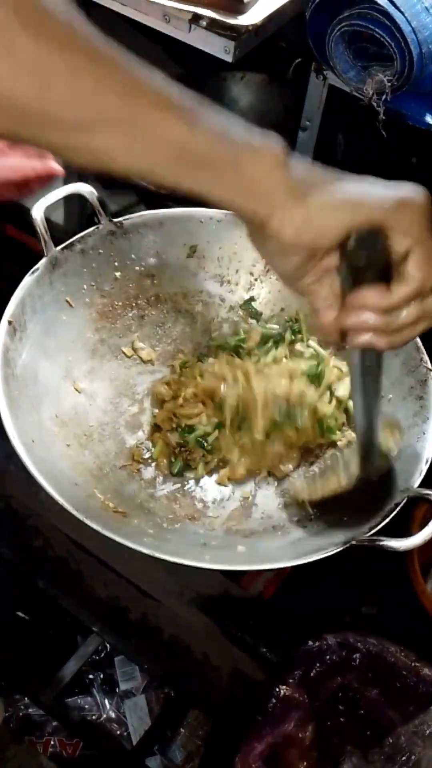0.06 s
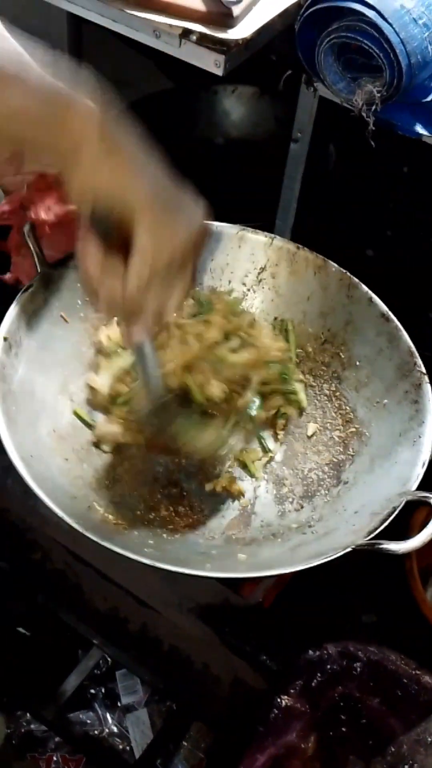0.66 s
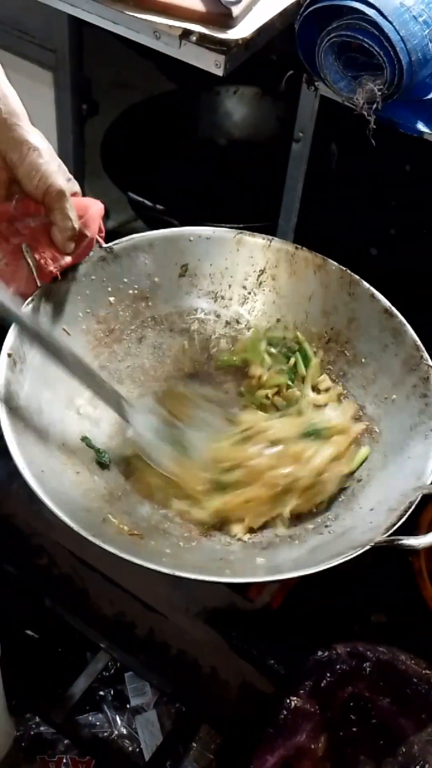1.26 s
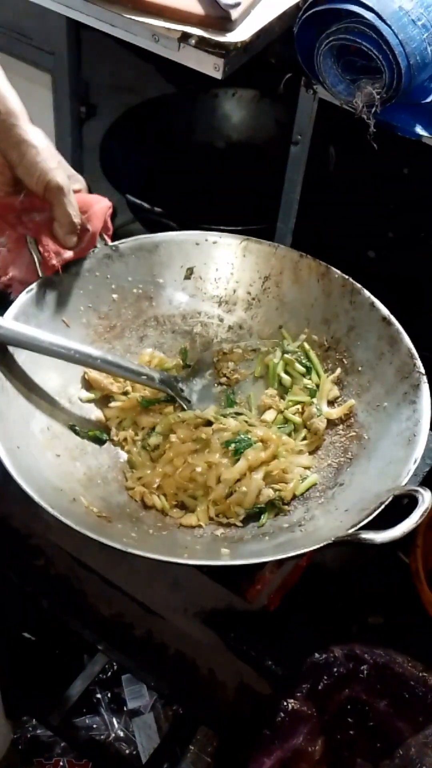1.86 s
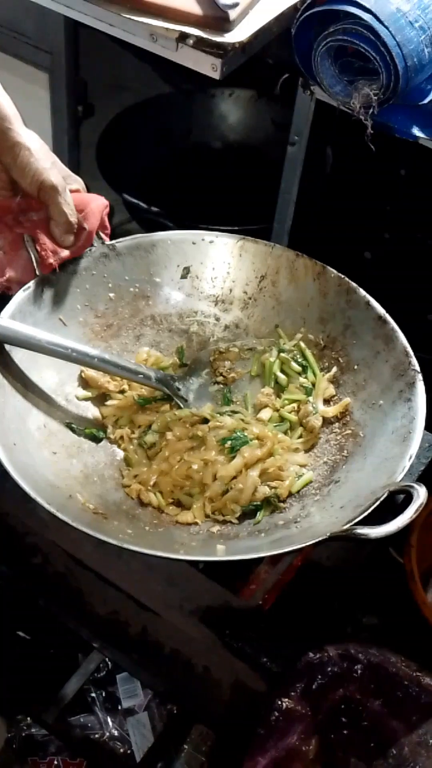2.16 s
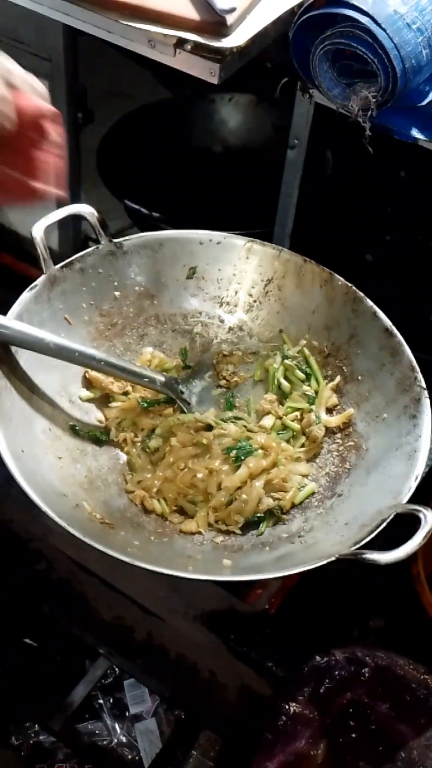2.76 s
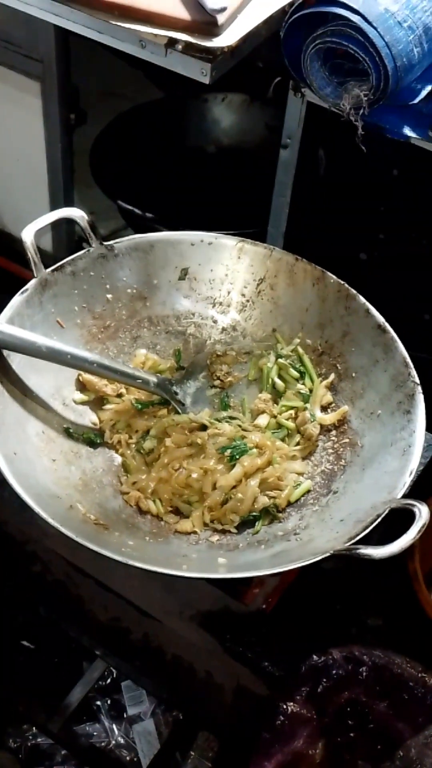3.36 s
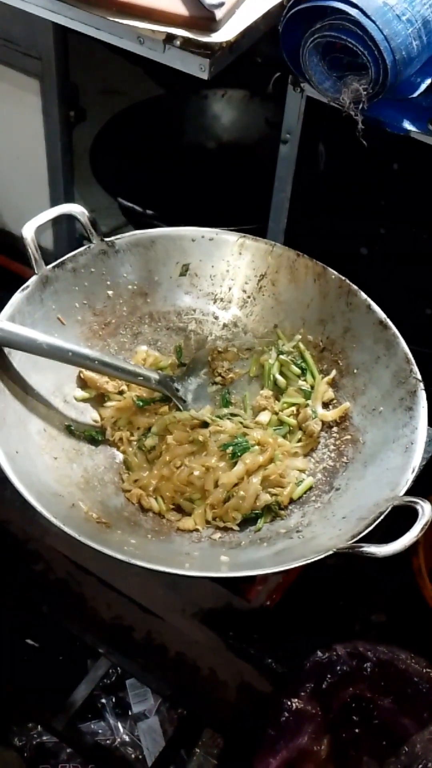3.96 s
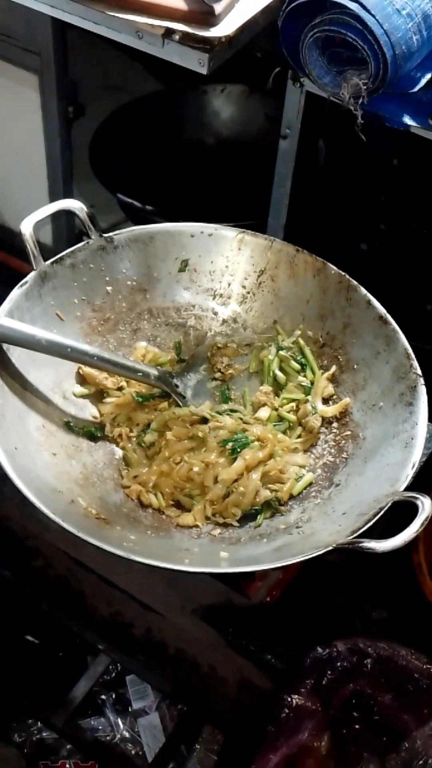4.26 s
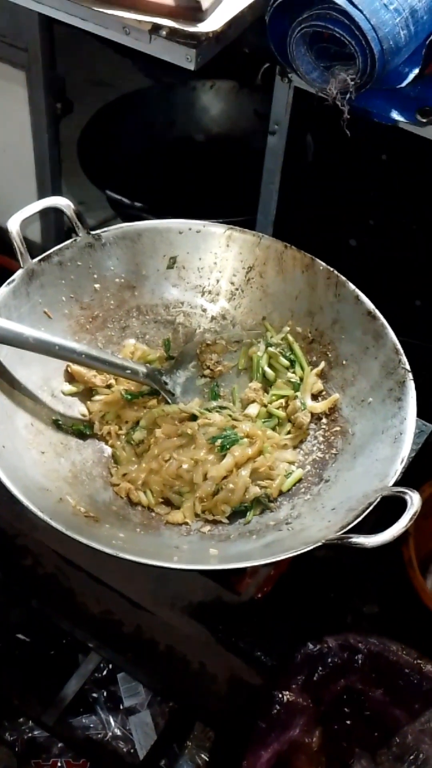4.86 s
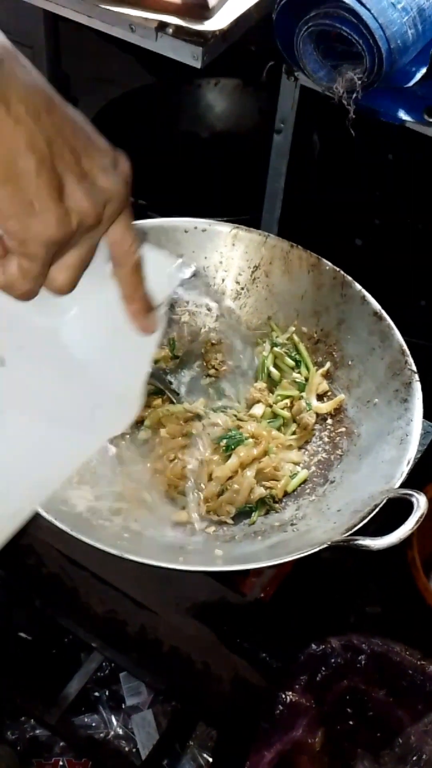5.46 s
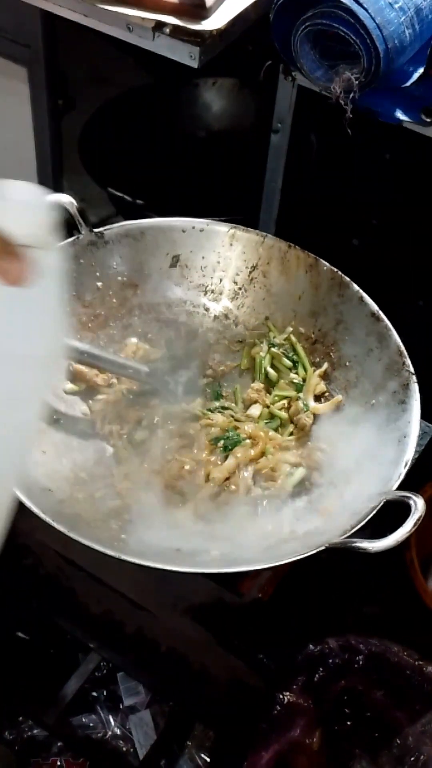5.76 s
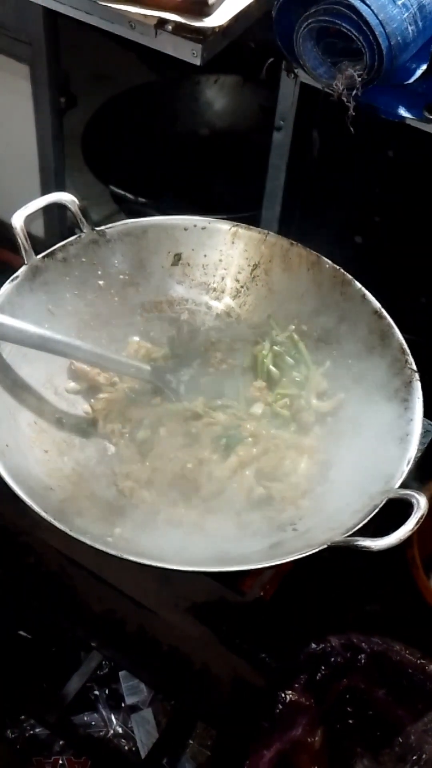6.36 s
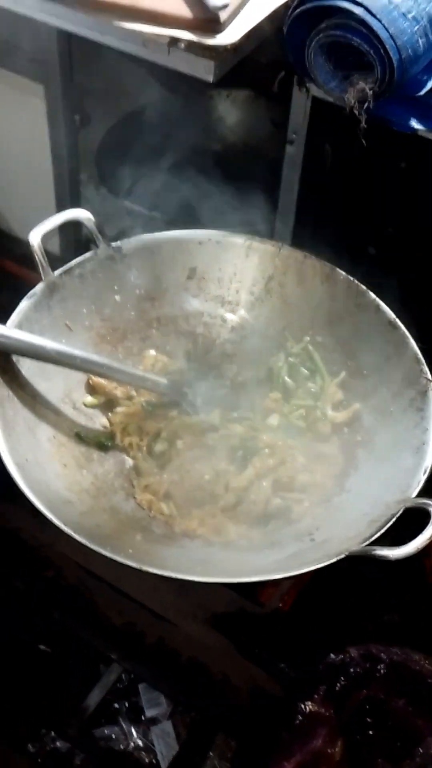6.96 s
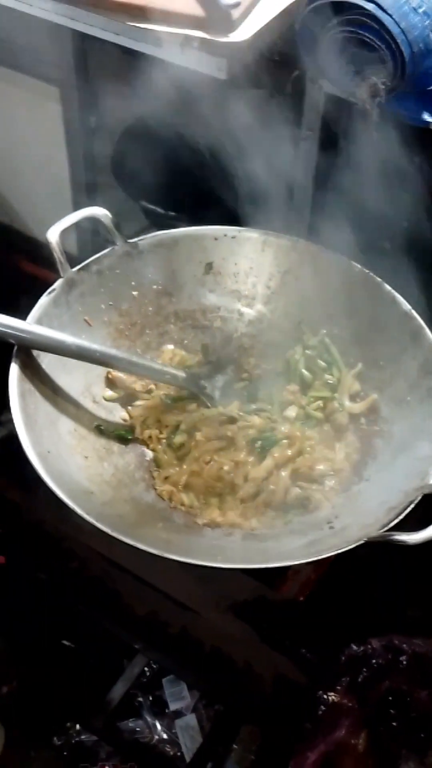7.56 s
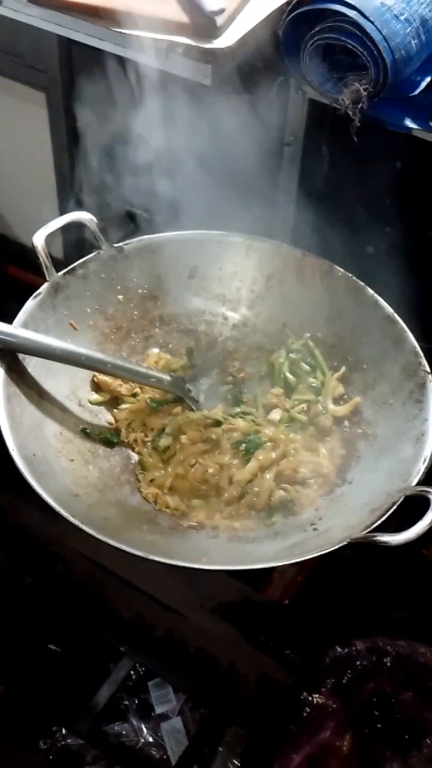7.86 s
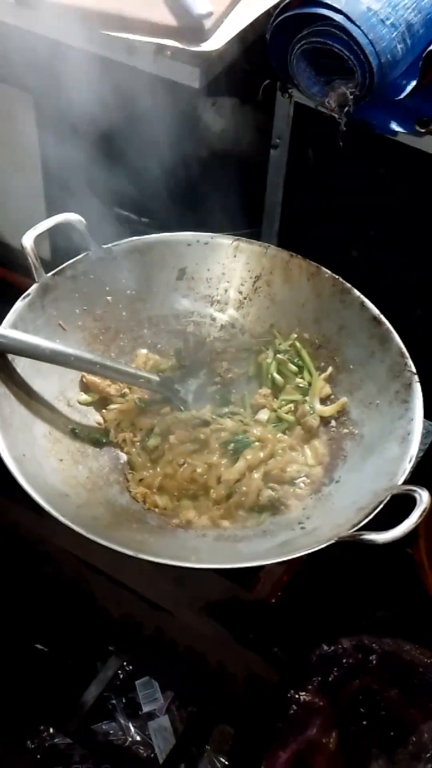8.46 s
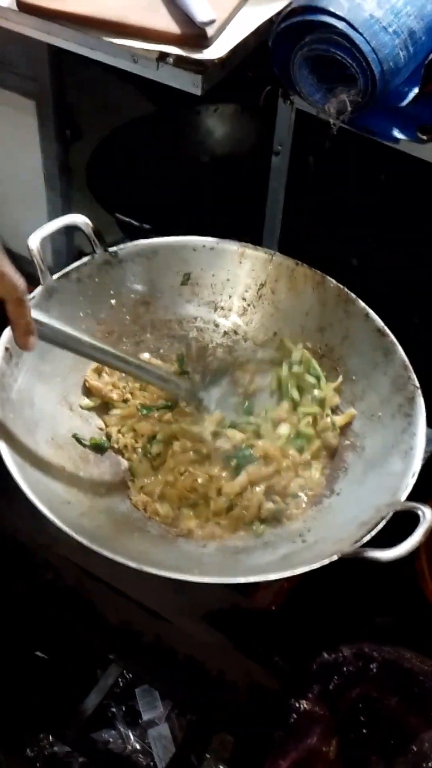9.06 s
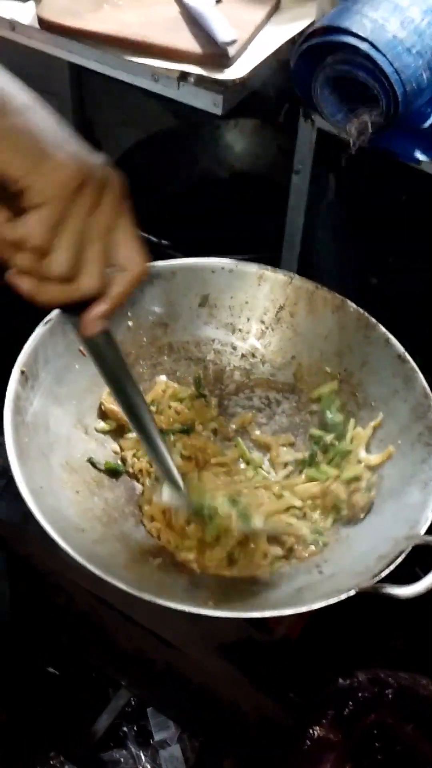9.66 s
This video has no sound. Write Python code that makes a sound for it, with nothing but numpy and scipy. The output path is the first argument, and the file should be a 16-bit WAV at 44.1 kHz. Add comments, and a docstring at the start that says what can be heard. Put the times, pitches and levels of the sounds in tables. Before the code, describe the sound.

Noodles sizzle in a steel wok over a roaring gas burner as a metal spatula scrapes and clanks, and added water hisses up.

```python
"""A gas burner roars and noodles sizzle in a steel wok, close to the microphone. A metal spatula
scrapes round the bowl, sticking and slipping, drops against it with a clank and rests. A splash of
water flares into steam, then stirring resumes. The sizzle is tiny bubbles bursting; steam whistles
faintly from under the food, and the flame makes the stove chamber sing. The two microphone ports
ring differently: the left near 2 and 7 kHz, the right near 10.5 kHz."""
import sys
import numpy as np
from scipy import signal
from scipy.fft import rfft, irfft, next_fast_len
from scipy.io import wavfile
from scipy.ndimage import uniform_filter1d

SR = 44100
rng = np.random.default_rng(int(sys.argv[2]) if len(sys.argv) > 2 else 0)


def wav_record(signal):
    """Record a signal, one row per channel, as 16-bit PCM in the file named by sys.argv[1]."""
    frames = np.transpose(np.atleast_2d(signal))
    bounded = np.clip(frames, -1, 1)
    # unit amplitude maps onto the largest positive 16-bit level
    quanta = np.round(bounded * 32767).astype(np.int16)
    wavfile.write(sys.argv[1], SR, quanta)


N = 429093
TIME = np.arange(N) / SR

# Colour of struck steel at the microphone. Each row: frequency in Hz, left and right level in dB.
STEEL_COLOUR = [(170, -28, -26), (460, -5, -2), (890, -7, -1.5), (1220, -1, -2), (1450, 3.5, 4),
                (2110, 8.5, -2), (3000, -21, -27), (3630, -14, -15), (4270, -4, -3), (5600, 2.5, 6.5),
                (6300, 5, 2), (7200, 17, 2), (8350, 1, 5.5), (9360, -6, 8), (9900, -14, 3),
                (11000, -10, 16), (12200, -14, 4.5), (13300, -18, -14)]


def gain_of(db):
    """Decibels to amplitude."""
    return 10 ** (np.asarray(db) / 20)


def unit_rms(x):
    """Scales to rms 1."""
    return x / np.sqrt(np.mean(x ** 2) + 1e-20)


def by_time(rows, t):
    """Every column of a curve at the times t."""
    s, *columns = np.transpose(rows)
    return np.array([np.interp(t, s, c) for c in columns])


def by_pitch(rows, hz):
    """Every column of a spectrum at the frequencies hz."""
    f, *columns = np.transpose(rows)
    return np.array([np.interp(np.log(hz + 1), np.log(f), c) for c in columns])


def add(mix, s, sound):
    """Mixes a stereo sound in at s seconds."""
    part = mix[:, round(s * SR):][:, :sound.shape[1]]
    part += sound[:, :part.shape[1]]


def tint(x, spectrum_db):
    """Filters by a function from Hz to dB; rms 1."""
    size = next_fast_len(x.shape[-1])
    gain = gain_of(spectrum_db(np.fft.rfftfreq(size, 1 / SR)))
    return unit_rms(irfft(rfft(x, size) * gain, size)[..., :x.shape[-1]])


def sweep(x, field_db, size):
    """Filters by a function from (Hz, s) to dB."""
    frames = dict(fs=SR, nperseg=size, noverlap=size * 3 // 4)
    hz, t, spectra = signal.stft(x, **frames)
    return signal.istft(spectra * gain_of(field_db(hz, t)), **frames)[1][..., :N]


def treble(x, edge_hz, order=2):
    """Keeps what lies above edge_hz."""
    return signal.sosfilt(signal.butter(order, edge_hz, "high", fs=SR, output="sos"), x)


def bell(offset, width):
    """Bell curve, 1 at zero offset."""
    return np.exp(-.5 * (offset / width) ** 2)


def swell(top_s, half_s):
    """Envelope that rises to 1 at top_s and falls again."""
    return np.exp(-((TIME - top_s) / half_s) ** 2)


def surges(rows, t):
    """Joint amplitude of overlapping surges that rise and die away, for each level column."""
    power = 0
    for start, rise_s, fade_db_per_s, *levels_db in rows:
        rise = np.sin(np.pi / 2 * np.clip((t - start) / rise_s, 0, 1))
        fade = gain_of(-fade_db_per_s * np.maximum(t - start - rise_s, 0))
        power += (gain_of(levels_db)[:, None] * rise * fade) ** 2
    return np.sqrt(power)


def waver(rate_hz, shape=N):
    """Slow random movement, mostly below rate_hz; rms 1."""
    return tint(rng.standard_normal(shape), lambda hz: -20 * np.log10(1 + (hz / rate_hz) ** 2))


def crackle(per_s, spread_db):
    """Random clicks, most of them small and a few large; rms 1."""
    size = gain_of(spread_db * np.minimum(rng.exponential(1, N), 5))
    return unit_rms(size * rng.choice([-1, 1], N) * (rng.random(N) < per_s / SR))


def mode(hz, t):
    """A sine that reaches each port in a random phase."""
    return np.sin(2 * np.pi * (hz * t + rng.random((2, 1))))


def burner(roar_db=1.0, rumble_db=-37.0, jet_db=-51.5, rush_hz=720, gust_db=0.88, lick_db=2.0):
    """A turbulent flame roars under the bowl over the steady hiss of the gas jet."""
    # Draught of the burner. Each row: time in seconds, roar in dB, lift of the higher rush in dB.
    draught = [(0, -38.5, 2), (1.1, -38, 0.5), (1.55, -35, -10), (1.9, -35, -1), (2.15, -37.5, -5.5),
               (4.2, -38.5, -4), (4.7, -39.5, -7.5), (5.5, -37, -8), (5.85, -36.5, -3.5), (6.7, -37.5, 0.5),
               (7.1, -36, -2.5), (7.5, -37.5, -3), (7.85, -37.5, 2.5), (8.5, -38, -1.5), (9.05, -34.5, 2.5),
               (9.25, -39, 1.5), (9.73, -36, 0)]
    # Colour of the roar. Each row: frequency in Hz, relative level in dB.
    roar_colour = [(25, -47), (60, -30), (128, -13), (150, -20), (168, -35), (200, -11.5), (300, -2.5),
                   (355, -0.5), (430, -3.5), (495, -6), (560, -11.5), (800, -20), (960, -25.5),
                   (1250, -33.5), (3000, -57)]
    # Peaks and hollows from stove and bowl. Each row: frequency in Hz, width in Hz, lift in dB.
    stove_peaks = [(292, 10, 2.5), (355, 18, 2), (435, 14, -3), (490, 12, 3), (526, 20, -5), (574, 11, 5),
                   (613, 11, 4), (778, 20, 2.5), (850, 15, -2.5), (905, 20, 2), (1130, 22, 4)]
    # Likeness of the flame at the two ports. Each row: frequency in Hz, correlation from -1 to 1.
    port_likeness = [(30, 1), (130, 0.97), (300, 0.98), (470, 0.77), (630, 0.056), (1400, 1), (2000, -1)]
    # A hollow howl in the roar. Each row: time in seconds, pitch in Hz, lift in dB.
    howl = [(7.0, 565, -1), (7.2, 570, 3.5), (7.5, 590, 7.5), (7.85, 613, 5), (8.15, 610, 6),
            (8.55, 610, -3), (8.9, 640, 1.5)]
    # Colour of the gas jet. Each row: frequency in Hz, left and right level in dB.
    jet_colour = [(300, -2, 3), (1270, -0.5, 3), (2010, 16.5, 11.5), (2570, 7.5, -34), (6250, -5.5, 4),
                  (8650, 14.5, -7), (10500, -15, 7), (14000, -58, 6.5)]

    common, separate = rfft(rng.standard_normal((2, N)))
    bins_hz = np.fft.rfftfreq(N, 1 / SR)
    likeness = np.clip(by_pitch(port_likeness, bins_hz)[0], -1, 1)
    left = common * np.exp(-2j * np.pi * bins_hz * 0.0001)  # farther from the flame: 0.1 ms late
    right = likeness * common + np.sqrt(1 - likeness ** 2) * separate
    roar = tint(irfft([left, right], N), lambda hz: by_pitch(roar_colour, hz)
                + sum(db * bell(hz - peak_hz, width) for peak_hz, width, db in stove_peaks))
    turbulence = waver(rate_hz=3.5), waver(rate_hz=3.5)

    def flame_db(hz, t):
        """The rumble holds steady, the roar gusts, and flames licking the rim add a higher rush."""
        hz = hz[:, None]
        level_db, rush_db = by_time(draught, t)
        howl_hz, howl_db = by_time(howl, t)
        gust, lick = (np.interp(t, TIME, curve) for curve in turbulence)
        rim_db = bell(np.log2((hz + 1) / rush_hz), width=0.31) * (rush_db + lick_db * lick)
        hollow_db = howl_db * bell(hz - howl_hz, width=38)
        return np.where(hz < 170, rumble_db, level_db + roar_db + gust_db * gust + rim_db + hollow_db)

    jet = tint(rng.standard_normal((2, N)), lambda hz: by_pitch(jet_colour, hz))
    return sweep(roar, flame_db, size=1024) + gain_of(jet_db) * jet


def sizzle(colour, bend, band, bubbles_per_s, spread_db, trim_db=6.5, sputter_db=0.33, patchy_db=1.5):
    """Tiny bubbles burst on hot steel. bend scales the pitch; band 0 is high fizz, 1 lower hiss."""
    # The simmer sinks as the noodles dry and returns with the water.
    # Each row: time in seconds, fizz and hiss in dB.
    simmer = [(0, -41, -49), (.65, -49, -41.5), (1.1, -42, -50), (2.3, -48, -50), (2.85, -39.5, -43.5),
              (4.3, -44, -46.5), (5.25, -45, -49), (6.8, -43, -43.5), (8.1, -38, -41.5), (8.6, -37.5, -39),
              (8.85, -40, -39), (9.73, -38.5, -43.5)]
    # Wet food or water flares on hot steel.
    # Each row: start and rise in seconds, fade in dB per second, fizz and hiss in dB.
    flares = [(.05, .15, 2, -37.5, -52), (1.17, 0.21, 8, -33, -37.5), (1.86, 0.11, 49, -39, -53),
              (5.36, 0.21, 8, -28, -37), (5.6, 0.12, 15, -27.5, -34), (6.95, 0.15, 13, -35, -41.5),
              (7.42, 0.059, 30, -35.5, -38), (7.66, 0.085, 54, -40.5, -36), (9.14, .06, 65, -52, -40),
              (9.36, 0.11, 8, -37.5, -41)]
    # Extra width of the sizzle's band. Each row: time in seconds, push towards the wide colour in dB.
    widening = [(0, 4.5), (1.2, 0), (5.35, -2.5), (6.0, 9), (6.25, -1), (7.2, -2.5), (9.73, -0.5)]
    # Levels for the narrow, medium and wide colour, in that order. Each row: fizz and hiss in dB.
    width_levels = [(-44, -48), (-37.5, -40.5), (-26, -33)]

    def sizzle_db(hz, t):
        """The sizzle's band sounds narrow when quiet and wider when loud."""
        power = gain_of(by_time(simmer, t)) ** 2 + surges(flares, t) ** 2
        sputter = np.interp(t, TIME, waver(rate_hz=16.0))
        level_db = 10 * np.log10(power[band]) + sputter_db * sputter
        width_db = level_db + by_time(widening, t)[0]
        steps_db = np.transpose(width_levels)[band]
        shares = np.array([np.interp(width_db, steps_db, step) for step in np.eye(len(steps_db))])
        colours_db = by_pitch(colour, hz[:, None] / np.interp(t, TIME, bend))
        shape_db = np.sum(colours_db * shares[:, None], axis=0)
        shape_db -= 10 * np.log10(np.mean(gain_of(shape_db) ** 2, axis=0))
        patches = uniform_filter1d(rng.standard_normal(shape_db.shape), size=60, axis=1)
        patches = unit_rms(uniform_filter1d(patches, size=2, axis=0))
        return shape_db + level_db + trim_db + patchy_db * patches

    # larger bubbles each let out a short puff of steam
    large_bubbles = crackle(per_s=350, spread_db=3.0)
    puff_power = signal.lfilter([1], [1, -np.exp(-1 / (0.0086 * SR))], large_bubbles ** 2)
    puffs = unit_rms(np.sqrt(puff_power) * rng.standard_normal(N))
    return sweep(unit_rms(crackle(bubbles_per_s, spread_db) + 0.73 * puffs), sizzle_db, size=256)


def frying(usual_hiss_hz=7260, spit_left_db=-12.0, spit_right_db=4.5):
    """The food hisses at the left port and fizzes at the right, with single drops spitting over it."""
    # Sizzle at each port. Each row: frequency in Hz, then the narrow, medium and wide colour in dB.
    left_colour = [(700, -25, -46, -39), (1490, -22, -22.5, -25), (1980, -15.5, -18, -18),
                   (2820, -38, -31.5, -38), (4950, -19.5, -21.5, -23), (6310, -21.5, -21, -18),
                   (6670, -19, -4, -0.5), (7250, 4.5, 3, 5.5), (7945, -20.5, -1.5, -2),
                   (7980, -30, -21, -5), (8600, -24, -28, -1), (9100, -23, -28, -23),
                   (14000, -37, -31.5, -28)]
    right_colour = [(700, -22.5, -38, -42), (1990, -19.5, -26.5, -28.5), (2800, -22, -30.5, -39),
                    (7000, -21, -27, -27.5), (7850, -19, -28, -16.5), (9030, -26, -17.5, -9),
                    (9480, -17, -7, -5), (9910, -7, -1.5, -4.5), (10400, 7, -0.5, 1), (10850, 0.5, 1, 2),
                    (11290, -7, -4, -7), (11630, -19, -5, -3), (11900, -22, -14, -6),
                    (12300, -24, -17, -11), (12840, -26, -20.5, -7), (14400, -45, -37, -24)]
    # The lower hiss wanders. Each row: time in seconds, pitch in Hz.
    hiss_pitch = [(0, 7300), (1.3, 7200), (2.4, 7310), (4.39, 7300), (4.77, 7050), (5.01, 7350),
                  (5.6, 7300), (7.07, 7230), (7.61, 7340), (9.1, 7250), (9.48, 7480), (9.73, 7280)]
    # Drops of fat and water burst. Each row: start in seconds, relative peak in dB, decay in seconds.
    spits = [(0.58, -20, .001), (0.6448, -21, .0009), (0.802, -23, .001), (1.543, -18, .001),
             (1.631, -19, .001), (3.3536, -23, .001), (3.7625, -24, .0005), (3.7915, -18, .0005),
             (3.846, -25, .0005), (5.179, -29, .0006), (5.237, -24, .0012), (5.312, -23, .001),
             (5.315, -25, .0007), (5.371, -21, .001), (6.5917, -20.5, .001), (8.68, -23, .001)]

    bend = by_time(hiss_pitch, TIME)[0] / usual_hiss_hz
    out = np.array([sizzle(left_colour, bend, band=1, bubbles_per_s=8000, spread_db=3.0),
                    sizzle(right_colour, np.ones(N), band=0, bubbles_per_s=9000, spread_db=2.0)])

    def spit_colour(hz):
        """A single drop is too small to radiate anything but treble."""
        ports_db = np.array([by_pitch(c, hz)[:2].mean(axis=0) for c in (left_colour, right_colour)])
        return ports_db + 40 * np.log10(np.clip(hz / 7000, .01, 1))

    t = TIME[:1024]
    balance = gain_of([[spit_left_db], [spit_right_db]])
    for s, peak_db, decay_s in spits:
        noise = tint(rng.standard_normal((2, len(t))), spit_colour)
        snap = treble(noise * t / decay_s * np.exp(-t / decay_s), edge_hz=4500)
        add(out, s, snap / abs(snap).max() * gain_of(peak_db) * balance)
    return out


def wok_ring(modes_db, detune, rise_s=0.00043):
    """The bowl answers a contact with a dense clatter and modes the touching blade pulls out of tune."""
    # Modes of the wok. Each row: frequency in Hz, left and right level in dB, t60 in seconds.
    wok_modes = [(475, -10, -7, .3), (585, -15, -14, .35), (700, -13, -11, .6), (770, -12, -10, .55),
                 (930, -12, -10, .55), (991, -13, -11, .6), (1085, -8, -6, .45), (1500, -6, -4, .27),
                 (1864, 1, -8, .42), (2110, -4, -13, .5), (2213, -3, -11, .5), (2290, -7, -7, .25),
                 (2546, -5, -10, .26), (2762, -14, -11, .25), (3305, -4, -10, .3), (3375, -6, -13, .25),
                 (3590, -5, -7, .25), (3730, -6, -11, .25), (3960, -7, -9, .25), (4080, -11, -6, .22),
                 (4597, -11, -12, .3), (4920, -7, -11, .3), (5087, -6, -9, .3), (5230, -4, -6, .4),
                 (5421, -3, -8, .4), (5607, -4, -8, .3), (5672, -3, -6, .28), (5825, -8, -5, .27),
                 (6077, -4, -8, .35), (6153, -2, -9, .4), (6290, -7, -7, .3), (6695, 4, -8, .2),
                 (7040, 5, -8, .2), (7106, 3, -8, .2), (7680, 1, -8, .18), (8500, -1, -3, .2),
                 (9184, -10, -2, .18), (11112, -15, 3, .15)]
    # Decay of the clatter. Each row: frequency in Hz, t60 in seconds.
    clatter_decay = [(400, 0.96), (2000, 0.36), (5500, 0.42), (8000, 0.35), (12000, 0.084)]

    t = TIME[:SR // 2]
    noise = tint(rng.standard_normal((2, len(t))), lambda hz: by_pitch(STEEL_COLOUR, hz))
    clatter = sweep(noise, lambda hz, s: -60 * s / by_pitch(clatter_decay, hz).T, size=256)[:, :len(t)]
    ring = np.zeros((2, len(t)))
    for hz, left_db, right_db, t60 in wok_modes:
        pulled_hz = hz * (1 + detune * rng.uniform(-0.98, 1))
        ring += gain_of([[left_db], [right_db]]) * gain_of(-60 * t / t60) * mode(pulled_hz, t)
    return (clatter + gain_of(modes_db) * ring) * (1 - np.exp(-t / rise_s))


def spatula_ring(t60=0.048, right_db=-5.5):
    """Blade and shaft ring briefly after a contact, damped by the hand."""
    # Modes of the spatula. Each row: frequency in Hz, relative level in dB.
    spatula_modes = [(1233, -14), (1500, -11), (2080, -7), (2160, -6), (2235, -6), (2440, -10), (2540, -8),
                     (2800, -2), (2870, -4), (3210, 1), (3345, 0), (3415, 0), (3500, -1), (3590, 1),
                     (3665, 1), (3775, -3), (3900, -1), (4120, 0), (4230, -3), (4360, 0), (4500, -7),
                     (4760, -4), (5150, -5), (5290, -2), (5500, -5), (5730, -2)]

    t = TIME[:SR // 2]
    ring = sum(gain_of(db) * mode(hz, t) for hz, db in spatula_modes)
    return unit_rms(ring) * gain_of(np.array([[0], [right_db]]) - 60 * t / t60)


def scraping(edge_db=3.0, singing_db=-10.5, spots_per_s=40.0, spot_count=5):
    """The edge sticks and slips: the spatula sings, and the bowl answers differently at each spot."""
    # Spatula strokes. Each row: start and rise in seconds, fade in dB per second,
    # then grating of the edge, rubbing of the blade and singing of the blade in dB.
    strokes = [(.087, 0.0071, 73, -32.5, -50, -25.5), (.155, 0.02, 56, -37.5, -52, -34),
               (.196, .015, 91, -44, -56, -30), (.3, .1, 35, -51, -50, -55),
               (.56, 0.043, 80, -50, -51, -50), (.82, 0.16, 120, -55, -45.5, -55),
               (1.0, 0.1, 41, -70, -46.5, -70.5), (1.35, 0.17, 15, -43.5, -47.5, -54),
               (1.666, 0.0078, 83, -31, -50, -40), (1.712, 0.019, 148, -39, -41, -33),
               (1.77, 0.08, 58, -54, -36.5, -40), (1.91, 0.042, 85, -43, -36.5, -47),
               (8.9, 0.19, 57.5, -48, -61, -46), (9.37, 0.095, 102, -58, -47.5, -58),
               (9.62, .1, 60, -67, -50, -65)]
    # Colour of the two contacts. Each row: frequency in Hz, edge and blade level in dB.
    contact_colour = [(250, -30, -11), (600, -9, 14), (740, -4, 19.5), (958, -9, 15), (1260, -26, -10),
                      (2080, 5, 8.5), (2750, -3, 0), (3480, 1, -20), (4870, 4, -31), (6300, 0.5, -14),
                      (7200, 6, -6), (13900, 6.5, 7)]

    slips = crackle(per_s=700, spread_db=3.5)[None]
    spot = (TIME * spots_per_s).astype(int) % spot_count
    bowl = np.zeros((2, N))
    for k in range(spot_count):
        ring = wok_ring(modes_db=-15.0, detune=.008)
        bowl += signal.oaconvolve(slips * (spot == k), ring, axes=1)[:, :N]
    song = unit_rms(signal.oaconvolve(slips, spatula_ring(), axes=1)[:, :N])
    edge = tint(bowl, lambda hz: by_pitch(contact_colour, hz)[0])
    blade = tint(bowl, lambda hz: by_pitch(contact_colour, hz)[1])
    grating, rubbing, singing = surges(strokes, TIME)
    return gain_of(edge_db) * grating * edge + rubbing * blade + gain_of(singing_db) * singing * song


def clanking(crack_hz=6500, thud_db=-15.5, thud_hz=600, thud_octaves=0.98, thud_s=0.01):
    """A blow opens with a bright crack and a thud of the wok's floor, then bowl and spatula ring on."""
    # The spatula strikes the wok. Each row: start in seconds, ring of the bowl in dB, crack in dB,
    # contact time in seconds, ring of the spatula in dB.
    blows = [(.088, -36, -21, .004, -36), (.157, -39, -22, .003, -38), (.1956, -37, -29, .002, -24.5),
             (.2968, -46, -31, .002, -38), (1.6663, -20, -8.5, .008, -42), (1.6722, -28, -21, .003, -38),
             (1.6785, -30, -23, .003, -33), (1.6825, -30, -22, .003, -28), (1.695, -33, -26, .002, -29),
             (1.7205, -29, -28, .003, -30), (1.7322, -29, -21, .003, -31), (1.7375, -32, -22, .003, -30),
             (1.752, -36, -30, .003, -32), (1.8103, -41, -36, .002, -38), (1.918, -44, -36, .002, -50),
             (1.9555, -44, -36, .003, -48)]

    out = np.zeros((2, N))
    for s, bowl_db, crack_db, contact_s, spatula_db in blows:
        bowl = gain_of(bowl_db) * wok_ring(modes_db=-9.0, detune=.0005)
        t, noise = TIME[:bowl.shape[1]], rng.standard_normal(bowl.shape)
        steel = tint(noise, lambda hz: by_pitch(STEEL_COLOUR, hz))
        crack = treble(steel * np.exp(-t / contact_s), crack_hz, order=4)
        thud = tint(noise,
                    lambda hz: -12 * np.minimum((np.log2((hz + 1) / thud_hz) / thud_octaves) ** 2, 8))
        thud *= gain_of(thud_db) * np.exp(-t / thud_s) * (1 - np.exp(-t / 0.0011))
        add(out, s, bowl + gain_of(crack_db) * (crack + thud) + gain_of(spatula_db) * spatula_ring())
    return out


def squealing(t60=0.06):
    """Quick slips of the edge keep a few damped modes of the blade ringing."""
    # Modes of the blade, pressed down. Each row: frequency in Hz, left and right level in dB.
    blade_modes = [(1950, -9, -19), (2200, 4, -9), (3530, -6, -3), (3620, -2, 1), (3825, 2, 2),
                   (4340, -5, -2), (4690, -10, -6), (5150, -12, -12), (5720, -3, -5)]
    # The edge catches. Each row: start and rise in seconds, fade in dB per second, level in dB.
    catches = [(.835, 0.02, 70, -48), (.895, 0.045, 200, -43)]

    t = TIME[:SR // 10]
    ring = sum(gain_of([[left_db], [right_db]]) * mode(hz, t) for hz, left_db, right_db in blade_modes)
    slips = crackle(per_s=900, spread_db=5.5)[None]
    squeal = signal.oaconvolve(slips, ring * gain_of(-60 * t / t60), axes=1)[:, :N]
    return unit_rms(squeal) * surges(catches, TIME)


def steam_whistles(width_share=0.015, right_db=-8.0):
    """Steam squeezes out from under the noodles in faint airy tones, left of centre."""
    # Each row: time of the top and half length in seconds, pitch in Hz, level on the left in dB.
    whistles = [(4.05, 0.3, 1875, -56), (7.202, 0.096, 1950, -51), (7.6, .08, 6100, -49),
                (8.27, .12, 6530, -45), (8.9, .2, 6500, -50)]

    out = np.zeros((2, N))
    for top_s, half_s, pitch_hz, db in whistles:
        noise = rng.standard_normal((2, N))
        tone = tint(noise, lambda hz: -20 * np.log10(1 + ((hz / pitch_hz - 1) / width_share) ** 2))
        out += gain_of(db) * swell(top_s, half_s) * tone
    return out * gain_of([[0], [right_db]])


def stove_note(pitch_hz=217, drift_hz=4.5, flutter=0.19):
    """The flame makes the stove chamber sing; pitch and strength waver with the turbulence."""
    # Swells of the hollow note. Each row: time of the top and half length in seconds, level in dB.
    swells = [(4.95, 0.73, -45.5), (6.607, 0.34, -46), (8.053, 0.465, -45), (9.398, 0.69, -49.5)]

    drift, gust = waver(rate_hz=10, shape=(2, N))
    turns = np.cumsum(pitch_hz + drift_hz * drift) / SR
    note = unit_rms((1 + flutter * gust) * np.sin(2 * np.pi * turns))
    return note * sum(gain_of(db) * swell(top_s, half_s) for top_s, half_s, db in swells)


def scene():
    """At the stove: burner, food and spatula, all close to the microphone."""
    return burner() + stove_note() + frying() + scraping() + squealing() + clanking() + steam_whistles()


def record(dry):
    """The recorder cuts off the treble steeply at 14.35 kHz."""
    lowpass = signal.firwin(511, 14350, window=("kaiser", 9), fs=SR)
    return signal.oaconvolve(dry, lowpass[None], "same")


dry = scene()
out = record(dry)
wav_record(out)
```